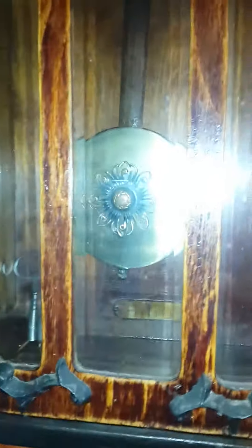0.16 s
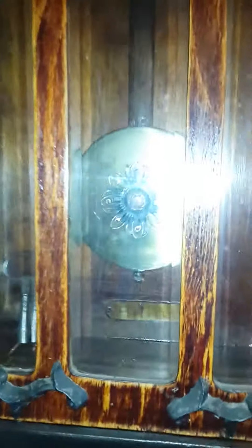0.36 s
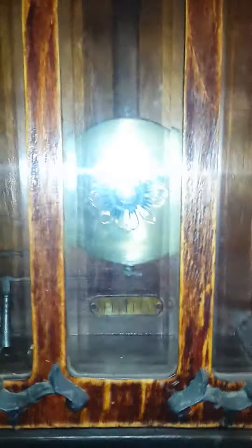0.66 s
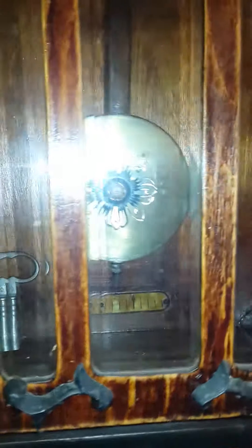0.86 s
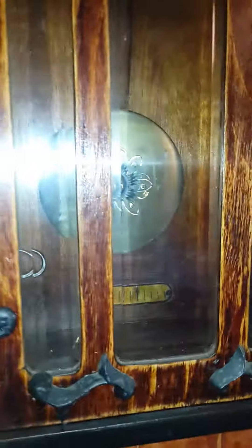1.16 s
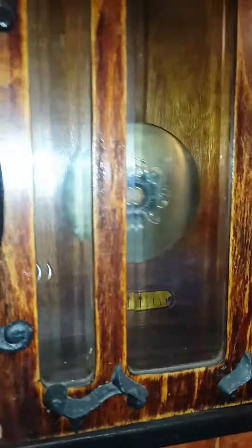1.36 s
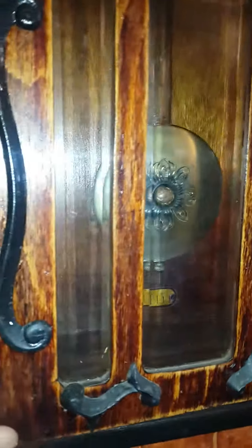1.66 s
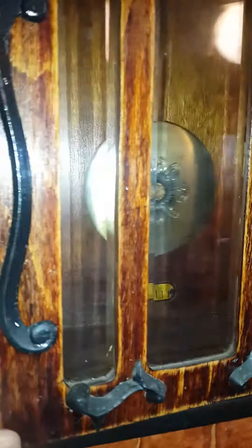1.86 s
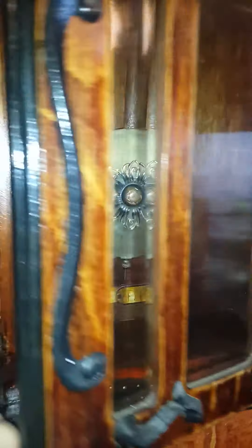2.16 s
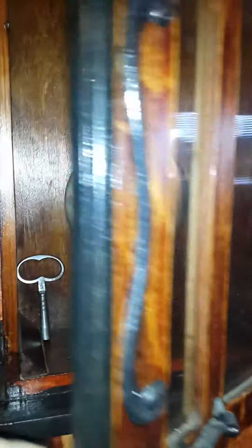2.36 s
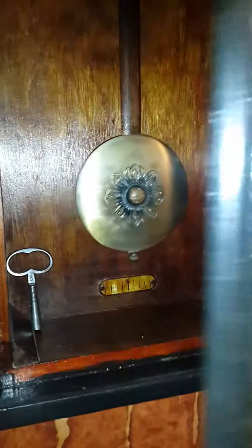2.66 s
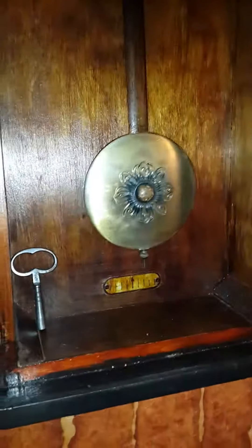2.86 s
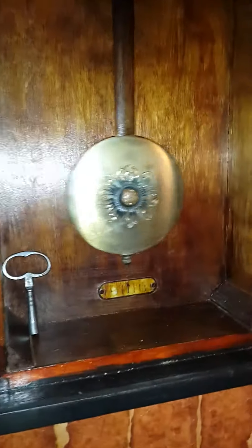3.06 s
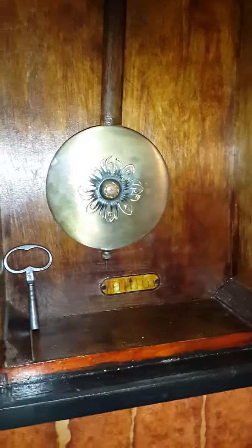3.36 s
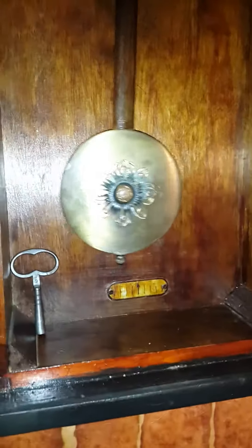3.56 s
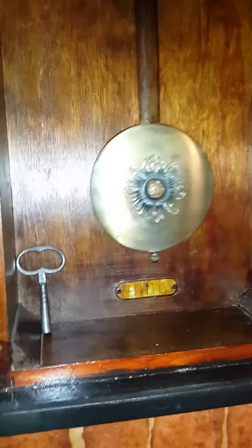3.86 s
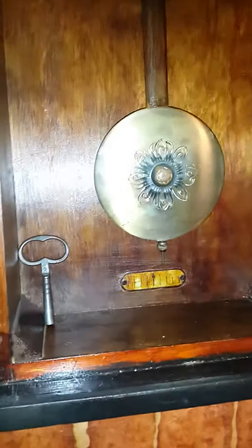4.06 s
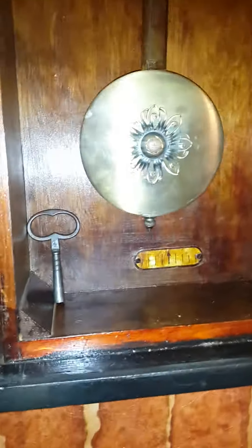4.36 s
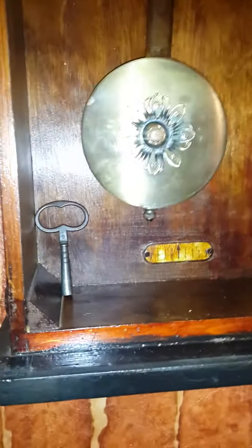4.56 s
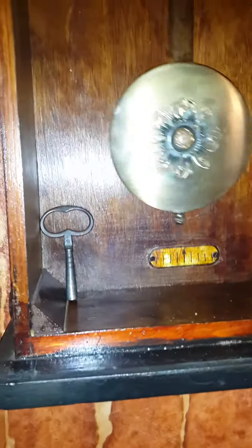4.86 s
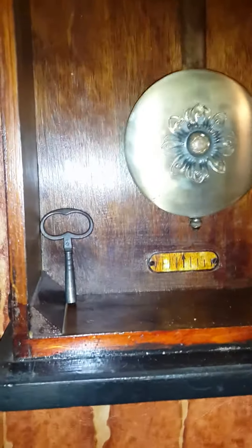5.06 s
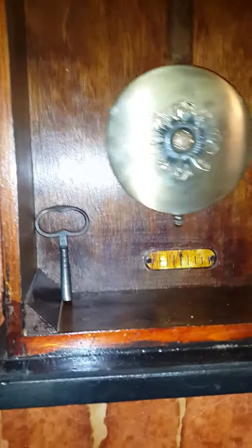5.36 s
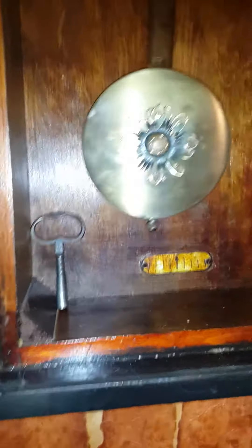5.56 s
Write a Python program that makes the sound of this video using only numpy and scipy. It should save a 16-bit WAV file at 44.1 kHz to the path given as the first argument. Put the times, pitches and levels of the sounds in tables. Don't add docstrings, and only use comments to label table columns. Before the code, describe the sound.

Nail clicks and a loud catch knock open a wall clock's glass door, while its steady tick-tock grows clearer in a small room.

```python
import sys
import numpy as np
from scipy import signal
from scipy.fft import rfft, irfft, next_fast_len
from scipy.io import wavfile
from scipy.ndimage import uniform_filter1d, map_coordinates

SR = 44100
rng = np.random.default_rng(int(sys.argv[2]) if len(sys.argv) > 2 else 0)


def natural_amplitude(level_db):
    exponent = np.asarray(level_db, float) / 20
    return 10 ** exponent


def persist_wave(psi):
    counts = np.round(np.clip(psi, -1, 1) * 32767).astype(np.int16)
    wavfile.write(sys.argv[1], SR, np.atleast_2d(counts).T)


N = 252468

# pitch_hz, level_db (per Hz)
HISS_COLOUR = [(26, -51), (45, -17.5), (139, -5.5), (165, -16), (195, 1.5), (221, -15), (438, -23),
               (507, -22), (546, -20.5), (681, -28.5), (1190, -24), (4160, -26.5), (5860, -20.5),
               (8260, -31.5), (15600, -29)]
# pitch_hz, level_db
COMPRESSOR_TONES = [(49, -74.5), (52.6, -77), (97.5, -72), (128, -87.5), (145.8, -76.5), (193.8, -76),
                    (196.3, -73), (1179, -84.5), (2745, -86.5), (3090, -86.5), (5687, -84.5), (5736, -80.5),
                    (5784, -86), (6029, -82), (6126, -85)]
# start_s, level_db, pitch_hz, length_s
FAR_CHIRRS = [
    (0.722, -65.5, 2080, 0.042),
    (0.799, -69.5, 770, 0.034),
    (3.763, -69, 2010, .03),
    (3.819, -73, 2050, 0.046),
    (4.842, -76.5, 1980, .08),
    (5.446, -73, 2000, .07),
]
# time_s, rustle_db
HAND_EFFORT = [(0.0, -51), (0.17, -65), (0.27, -70.5), (0.58, -70.5), (0.7, -60.5), (0.9, -70),
               (1.21, -58.5), (1.34, -47), (1.52, -61.5), (2.79, -62.5), (3.09, -70.5), (3.94, -73),
               (4.11, -66.5), (4.38, -73.5), (4.65, -67.5), (4.85, -74.5), (5.72, -70.5)]
# pitch_hz, level_db (per Hz)
RUMBLE_COLOUR = [(120, -23), (220, -9), (320, -4), (550, -7.5), (900, -13), (1600, -24)]
# time_s, openness (0 glass shut, 1 open and near)
DOOR_OPENNESS = [
    (0.5, 0.15),
    (1.1, 0.022),
    (1.65, 0.3),
    (2.25, 0.61),
    (2.8, 0.51),
    (3.9, 0.92),
    (5.7, 0.77),
]
# pitch_hz, t60_s (time to fall 60 dB)
ROOM_DECAY = [(150, 0.42), (600, 0.35), (2500, 0.21), (6000, 0.2), (12000, 0.18)]
# pitch_hz, likeness (1 same, 0 unrelated)
LEFT_RIGHT_LIKENESS = [(60, 0.96), (200, 0.9), (500, 0.64), (1000, -0.19), (2000, 0.023), (5000, -0.13),
                       (12000, 0.013)]
# pitch_hz, left_minus_right_db
PORT_COLOUR = [(60, 3), (110, 2.5), (200, 0), (380, 3), (700, 0), (1290, -3.5), (2380, -1.5), (4400, -0.5),
               (8120, 3.5), (15000, -0.5)]
# pitch_hz, left_minus_right_db
NEAR_FACING = [(3000, 1.5), (8000, 1), (15000, 14.5)]
# start_s, level_db, favoured_hz, focus_db (per octave), damping (by the hand)
CASE_BLOWS = [(0.146, -57.5, 363, 1, 1.9), (0.188, -60, 108, 8, 1.8), (1.05, -61, 420, 5, 1.1),
              (1.3166, -32, 200, 5, 1.1), (1.356, -38.5, 225, 2, 1.5), (1.421, -42, 203, 29, 1.14),
              (1.603, -58, 204.6, 7, 6.4), (1.995, -57.5, 460, 12, 1.14), (2.252, -59.5, 300, 13, 1.1),
              (2.488, -55.5, 290, 7, 1.8), (2.512, -54.5, 270, 13, 0.78)]
# pitch_hz, width_hz, level_db
CASE_MODES = [(94, 12, -11.5), (150.6, 15.36, -3.5), (177.4, 15, -5), (203, 8.6, -0.5), (243, 4.9, -10),
              (276.6, 21, -10.5), (323.3, 8, -4), (385, 25, -13), (442, 14.4, -10), (500.6, 10.5, -10),
              (535, 13, -12), (599, 15, -6.5), (701, 11, -12.5), (815, 35, -11.5), (980, 49, -18),
              (1204, 83, -21)]
# start_s, level_db, t60_s, favoured_hz, crack_db (over level)
CONTACTS = [
    (0.0, -47.5, 0.23, 4160, 4),
    (0.0831, -36.5, 0.41, 5730, 7.5),
    (0.1387, -36.5, 0.23, 6060, -6),
    (0.9999, -61.5, 0.41, 6040, 10),
    (1.2756, -47, 0.83, 4830, -1),
    (1.3172, -46.5, 0.59, 5900, 21),
    (1.3551, -39.5, 0.26, 3080, 13),
    (2.509, -59, 0.34, 5960, 18),
    (4.167, -62.5, 0.045, 4500, 12),
    (5.674, -61.5, 0.056, 12000, 15),
]
# start_s, level_db, rise_s, favoured_hz
FINGER_RUBS = [
    (0.613, -45.5, 0.01, 4970),
    (0.663, -51.5, 0.019, 5800),
    (0.857, -64.5, 0.013, 6100),
    (1.03, -62.5, 0.01, 1500),
    (1.899, -60, 0.07, 6840),
    (1.99, -63.5, 0.0042, 2000),
    (2.663, -57, 0.0099, 5000),
]
# pitch_hz, level_db (per Hz)
SCUFF_COLOUR = [(410, -25), (700, -6), (1620, -3.5), (2070, 0.5), (2490, -4.5), (2950, -2.5), (3190, -6.5),
                (4910, -2.5), (6980, -2.5), (10100, -15.5), (12700, -13.5), (14700, -18), (15900, -32)]
# start_s, peak_db, frame_db (ring of the frame)
TICK_TIMES = [
    (0.4995, -44, 5),
    (1.6563, -43.5, -6),
    (2.7992, -39, -4),
    (3.9459, -38.5, 2.5),
    (5.0928, -38.5, -0.5),
]
# start_s, peak_db, frame_db (ring of the frame)
TOCK_TIMES = [
    (1.0948, -42.5, -5),
    (2.2449, -39.5, 1.5),
    (3.3912, -37.5, -3),
    (4.5384, -35, 0.5),
    (5.6892, -35, -5),
]
# pitch_hz, width_hz, level_db
ENTRY_MODES = [(542.2, 11.3, -2), (953.5, 23, -2.5), (1500, 11, -7.5), (1780, 14, -16), (1950, 6.7, -1.5),
               (2054, 36, 0.5), (2194, 20, 4.5), (2580, 49, 3.5), (2780, 78, -29), (4380, 41, -17),
               (4580, 110, -2.5), (4940, 110, -4), (5560, 110, -23), (6680, 120, 1), (6700, 93, 2),
               (7200, 80, -32), (7250, 24, -5.5), (10090, 610, -4), (12300, 170, -35), (11400, 220, -12)]
# pitch_hz, width_hz, level_db
EXIT_MODES = [(570.6, 7.1, -0.5), (817, 35, -6), (994, 24, -15), (1500, 19, -11.5), (1900, 27, -7),
              (2120, 16, 3), (2210, 34, -3.5), (2568, 26, 1.5), (2920, 32, -27), (3663, 67, -10.5),
              (4810, 45, -5.5), (5400, 50, -16), (5000, 32, 1.5), (6420, 120, 6), (6330, 46, 1),
              (6170, 58, -23), (6440, 54, 6), (9320, 200, -9), (10070, 130, -13), (12500, 200, -37)]
# pitch_hz, level_db (per Hz)
CLATTER_COLOUR = [(150, -44), (250, 5), (414, -10), (576, 7.5), (971, -5.5), (1260, -7.5), (2530, 3),
                  (2760, -1.5), (3910, -5.5), (6360, 9.5), (8400, -42), (10900, -8.5), (16000, -35)]
# pitch_hz, t60_s
CLATTER_DECAY = [(300, 0.087), (2000, 0.16), (4500, 0.054), (6500, 0.09), (12000, 0.052)]
# pitch_hz, level_db (per Hz)
CRACK_COLOUR = [(1000, -33), (4000, 2), (7000, 8.5), (8600, -6), (10500, 4), (12500, 3), (14500, 2),
                (16400, -27)]
# pitch_hz, level_db (per Hz)
SLIDE_COLOUR = [(240, -5.5), (400, -7), (528, -7), (697, -19), (1030, 0), (1530, -4.5), (1710, 4.5),
                (3100, -11), (5600, -5), (14400, -29.5), (15600, -70)]
# pitch_hz, level_db (per Hz)
UNLOCK_COLOUR = [(500, -16), (800, -21), (1000, 0.5), (1300, -9), (1550, -15), (1950, -0.5), (2400, -11.5),
                 (4000, -17), (15500, -42)]

PLATE_DB, TILT_DB, WOOD_DB = (-10, 6), (-2, 0.97), (3.5, 0.3)
MAINS_DB, DRONE_DB = (0, -3.5), (-9.5, -2.5)
HISS_DB, SLIDE_DB, UNLOCK_DB = -66.5, -53, -65.5
RUMBLE_DB, RUMBLE_GROWS, GRIP_GROWS = -69, 0.69, 0.37
WANDER_HZ, WANDER_SHARE, SWAY_DB = 0.6, 0.0004, 1.5
CONTACT_RISE_S, RUB_T60_S, HAND_PAN_DB = 0.0022, 0.21, 0.5


def unit(x):
    return x / np.sqrt(np.mean(x ** 2) + 1e-20)


def along(points, hz):
    f, v = np.transpose(points)
    return np.interp(np.log(hz + 1), np.log(f + 1), v)


def filtered(x, response):
    m = next_fast_len(x.shape[-1] + 8192)
    spectrum = rfft(x, m) * response(np.fft.rfftfreq(m, 1 / SR))
    return irfft(spectrum, m)[..., :x.shape[-1]]


def curves(rows):
    s, *columns = np.transpose(rows)
    return [np.interp(np.arange(N) / SR, s, c) for c in columns]


def wobble(rate):
    knots = rng.standard_normal(int(N * rate / SR) + 4)
    return map_coordinates(knots, [np.arange(N) * rate / SR])


def seen(s, pair):
    at, share = np.transpose(DOOR_OPENNESS)
    return pair[0] + (pair[1] - pair[0]) * np.interp(s, at, share)


def add(out, s, x, pan_db=0):
    part = out[:, max(round(s * SR), 0):][:, :x.shape[1]]
    panned = x * natural_amplitude([[pan_db / 2], [-pan_db / 2]])
    part += panned[:, :part.shape[1]]


def patchy(colour, patchy_db):
    z = signal.stft(rng.standard_normal((2, N)), nperseg=512)[2]
    field = uniform_filter1d(rng.standard_normal(z.shape[1:]), 6, 0)
    field = uniform_filter1d(field, 14, 1)
    pair = signal.istft(z * natural_amplitude(patchy_db * unit(field)), nperseg=512)[1][:, :N]
    return unit(filtered(pair, lambda hz: natural_amplitude(along(colour, hz))))


def fading(decays, size):
    hz, t, z = signal.stft(rng.standard_normal((2, size)), SR, nperseg=128)
    decay = natural_amplitude(-60 * t / along(decays, hz)[:, None])
    return signal.istft(z * decay, SR, nperseg=128)[1][:, :size]


def puff(colour, rise, t60, centre_hz=None):
    t = np.arange(SR // 2) / SR

    def tint(hz):
        focus_db = 5.6 * np.abs(np.log2((hz + 1) / centre_hz)) if centre_hz else 0
        return natural_amplitude(along(colour, hz) - focus_db)

    shape = np.clip(t / rise, 0, 1) * natural_amplitude(-60 * np.clip(t - rise, 0, None) / t60)
    return shape * unit(filtered(rng.standard_normal((2, len(t))), tint))


def rings(modes, scatter_db):
    hz, width, db = np.transpose(modes)[:, :, None]
    t, chance = np.arange(SR // 2) / SR, rng.standard_normal((len(modes), 3))
    size = natural_amplitude(db + scatter_db * chance[:, :1]) * width * np.exp(-np.pi * width * t)
    turn = 2 * np.pi * hz * (1 + 0.0038 * chance[:, 1:2]) * t
    sign = (-1) ** np.arange(len(modes))[:, None]
    first = np.sum(sign * size * np.sin(turn), 0)
    second = np.sum(size * np.sin(turn + 9 * chance[:, 2:]), 0)
    return np.array([first, second])


def background():
    rustle_db, = curves(HAND_EFFORT)
    rumble_db = RUMBLE_DB + RUMBLE_GROWS * (rustle_db - rustle_db.mean())
    hiss = natural_amplitude(HISS_DB) * patchy(HISS_COLOUR, patchy_db=-1.9)
    rustle = natural_amplitude(rustle_db - 6 + wobble(21.3)) * patchy(SCUFF_COLOUR, patchy_db=-1)
    rumble = natural_amplitude(rumble_db - 4 + wobble(10)) * patchy(RUMBLE_COLOUR, patchy_db=1.5)
    return hiss + rustle + rumble


def compressor():
    out, t = np.zeros((2, N)), np.arange(N) / SR
    effort_db, = curves(HAND_EFFORT)
    grip_db = GRIP_GROWS * (effort_db - effort_db.mean())
    for hz, db in COMPRESSOR_TONES:
        second_order = 85 < hz < 110
        drone = hz < 70 or 150 < hz < 250
        drift = np.cumsum(wobble(9)) / SR * 2 * np.pi * (WANDER_HZ + WANDER_SHARE * hz)
        level_db = db + 3 + seen(t, MAINS_DB) * second_order + seen(t, DRONE_DB) * drone
        level_db = level_db + grip_db * (hz > 2000 or second_order)
        tone = natural_amplitude(level_db + SWAY_DB * wobble(5)) * np.sin(2 * np.pi * hz * t + drift)
        out += tone * [[1.2], [0.3]]
    return out


def far_chirrs():
    out = np.zeros((2, N))
    for s, db, hz, length in FAR_CHIRRS:
        swell = np.hanning(round(length * SR * 1.5))
        resonance = lambda f: 1j * f * 220 / (hz * hz - f * f + 1j * f * 220)
        chirr = unit(filtered(rng.standard_normal((2, len(swell))), resonance))
        add(out, s, natural_amplitude(db) * swell * chirr)
    return out


def room(x, step):
    out = np.zeros((2, N))
    for i in range(0, N, step):
        tail = fading(ROOM_DECAY, size=SR // 2)
        tail = tail / np.linalg.norm(tail[0])
        add(out, i / SR + 0.008, signal.fftconvolve(x[:, i:i + step], tail, axes=1))
    return out


def case():
    out, t = np.zeros((2, N)), np.arange(SR // 2) / SR
    for s, db, favoured_hz, focus_db, damping in CASE_BLOWS:
        place = [(hz, width * damping, level - focus_db * abs(np.log2(hz / favoured_hz)))
                 for hz, width, level in CASE_MODES]
        boom = rings(place, scatter_db=1.55) * (1 - np.exp(-t / 0.00034))
        add(out, s, natural_amplitude(db) * boom / np.sqrt(np.mean(boom[0, :SR // 30] ** 2)))
    return out


def hand():
    out = np.zeros((2, N))
    touches = [(s, db, CONTACT_RISE_S, t60, hz) for s, db, t60, hz, _ in CONTACTS]
    touches += [(s, db, rise, RUB_T60_S, hz) for s, db, rise, hz in FINGER_RUBS]
    for s, db, rise, t60, favoured_hz in touches:
        grain = natural_amplitude(2.24 * unit(uniform_filter1d(rng.standard_normal(SR // 2), size=90)))
        add(out, s, natural_amplitude(db) * grain * puff(SCUFF_COLOUR, rise, t60, favoured_hz), HAND_PAN_DB)
    for s, db, *_, crack_db in CONTACTS:
        add(out, s, natural_amplitude(db + crack_db) * puff(SCUFF_COLOUR, rise=0.0002, t60=0.002))
    return out


def beat(modes, clatter_db, frame_db, plate_db, tilt_db, wood_db):
    t = np.arange(SR // 2) / SR
    soft_start = 1 - np.exp(-t / 0.0044)
    heard = []
    for hz, width, db in modes:
        wood = wood_db * (hz < 1200)
        frame = frame_db * (1700 < hz < 2400)
        plate = plate_db * (2400 < hz < 2800)
        heard.append((hz, width, db + wood + frame + plate))
    ring = unit(rings(heard, scatter_db=0.4))
    clatter = unit(filtered(fading(CLATTER_DECAY, size=len(t)), lambda hz: natural_amplitude(along(CLATTER_COLOUR, hz))))
    crack = puff(CRACK_COLOUR, rise=0.00042, t60=0.036)
    both = soft_start * (ring + natural_amplitude(clatter_db) * clatter) + natural_amplitude(3) * crack
    both = filtered(both, lambda hz: natural_amplitude(tilt_db * np.log2((hz + 300) / 3000)))
    return both / np.sqrt(np.mean(both[0, :SR // 50] ** 2))


def escapement():
    out = np.zeros((2, N))
    glass = lambda s: [seen(s, pair) for pair in (PLATE_DB, TILT_DB, WOOD_DB)]
    for s, db, frame_db in TICK_TIMES:
        add(out, s - 0.0015, natural_amplitude(db - 6) * beat(ENTRY_MODES, -7.5, frame_db, *glass(s)), pan_db=2.8)
        add(out, s + 0.044, natural_amplitude(SLIDE_DB) * puff(SLIDE_COLOUR, rise=0.023, t60=0.21))
    for s, db, frame_db in TOCK_TIMES:
        add(out, s - 0.077, natural_amplitude(UNLOCK_DB) * puff(UNLOCK_COLOUR, rise=0.0022, t60=0.78))
        add(out, s - 0.0015, natural_amplitude(db - 8) * beat(EXIT_MODES, -5, frame_db, *glass(s)), pan_db=0.9)
    return out


def ports(pair):
    turn = lambda hz: np.arccos(np.clip(along(LEFT_RIGHT_LIKENESS, hz), -1, 1)) / 2
    mid, side = filtered(pair, lambda hz: np.array([np.cos(turn(hz)), np.sin(turn(hz))]))
    return np.array([mid + side, mid - side])


def left_right(table, hz):
    return natural_amplitude(np.array([[0.5], [-0.5]]) * along(table, hz))


def scene():
    clock, touch, knock = escapement(), hand(), case()
    walls = room(natural_amplitude(-4) * clock + natural_amplitude(-7.5) * touch + natural_amplitude(-5.5) * knock, SR // 5)
    below = lambda hz: hz < 15520
    near = ports(clock + knock + filtered(touch, below))
    near = filtered(near, lambda hz: left_right(NEAR_FACING, hz))
    return near + ports(filtered(walls + background(), below) + far_chirrs() + compressor())


def low_pass(x):
    return signal.sosfilt(signal.butter(12, 16430, fs=SR, output="sos"), x)


def record(dry):
    band = lambda hz: 1 / (1 + (38 / (hz + 1)) ** 4) / (1 + (hz / 16300) ** 80)
    mix = filtered(dry, lambda hz: left_right(PORT_COLOUR, hz) * band(hz))
    return low_pass(mix)


dry = scene()
out = record(dry)
persist_wave(out)
```